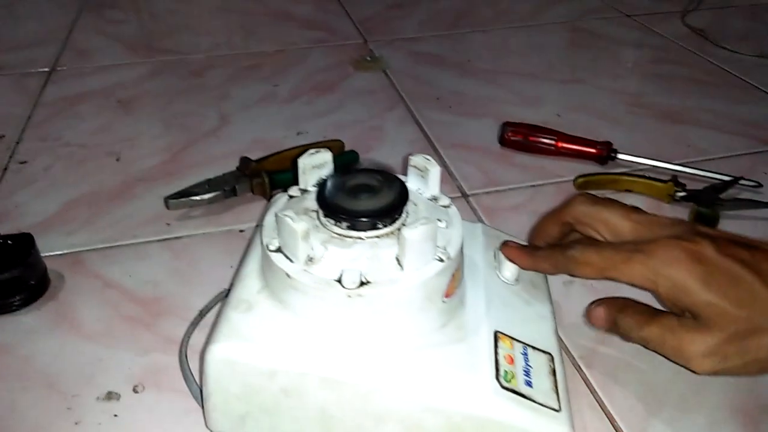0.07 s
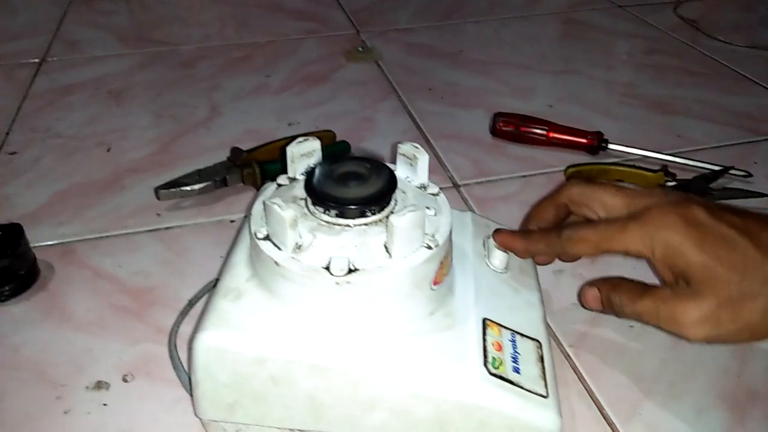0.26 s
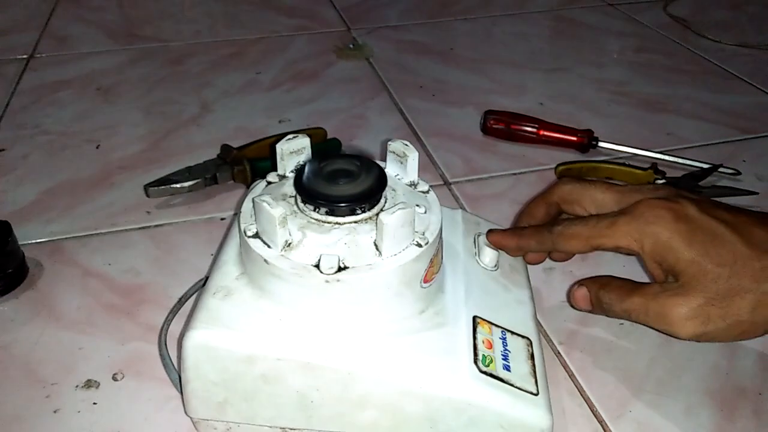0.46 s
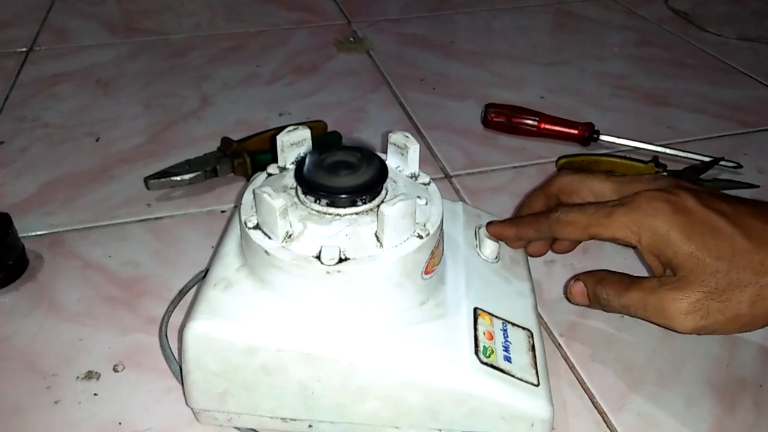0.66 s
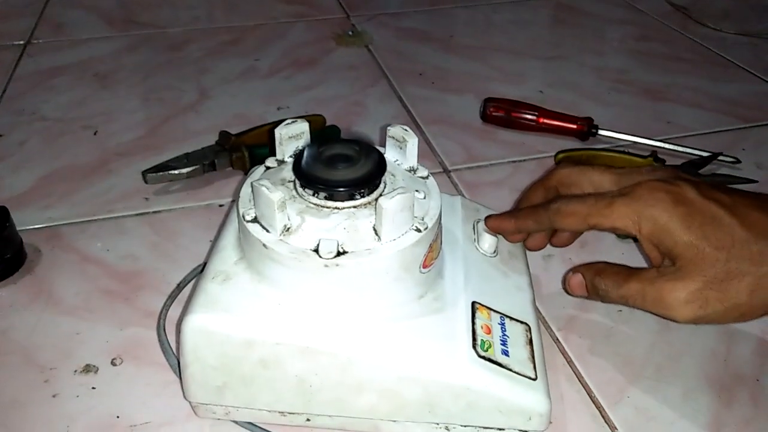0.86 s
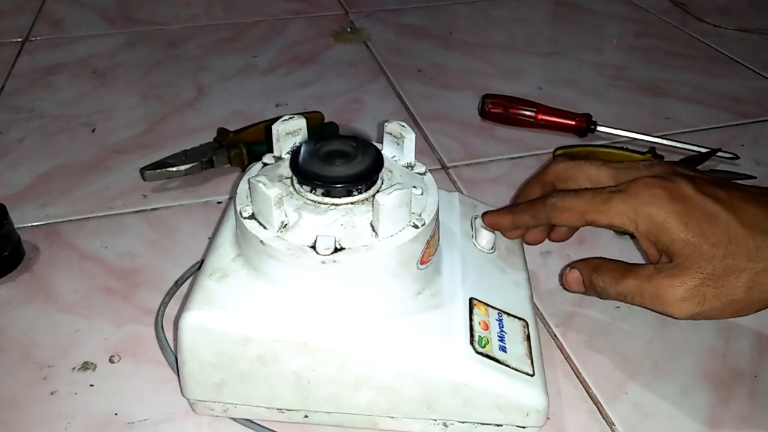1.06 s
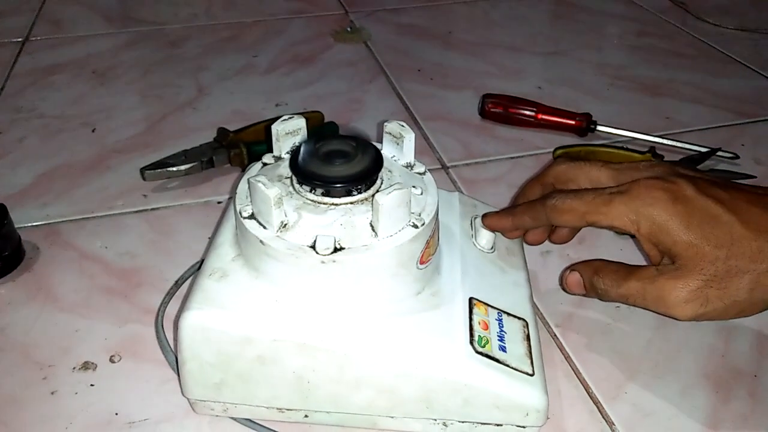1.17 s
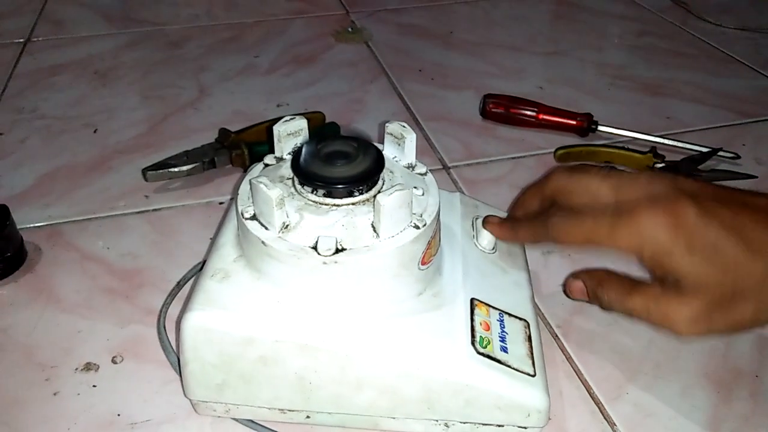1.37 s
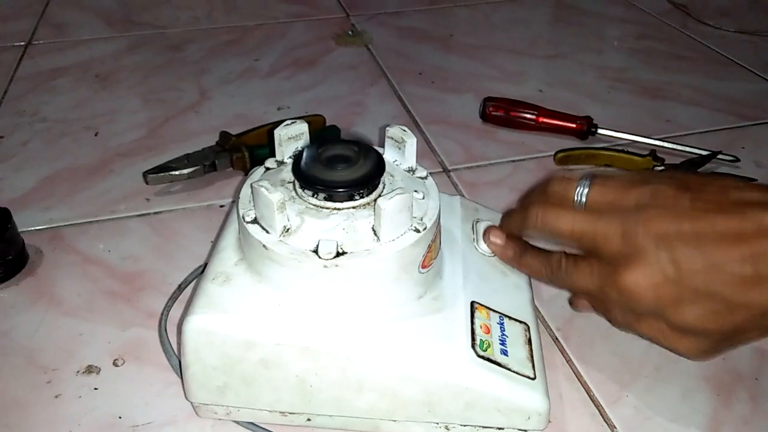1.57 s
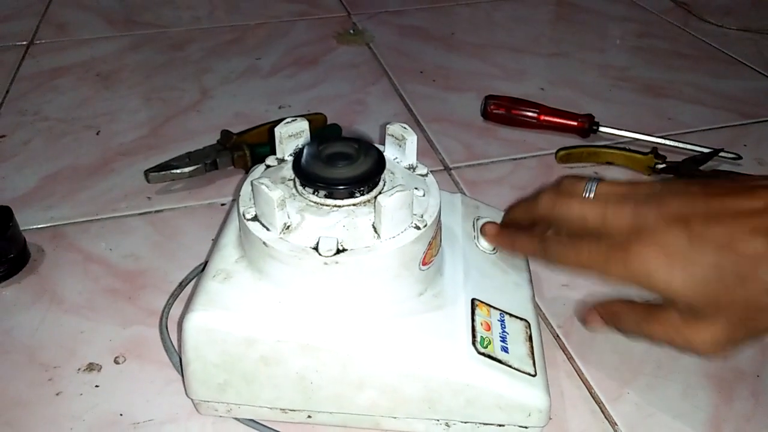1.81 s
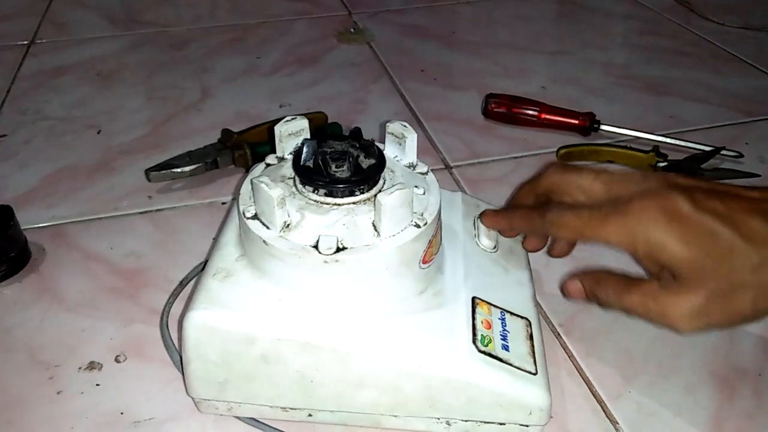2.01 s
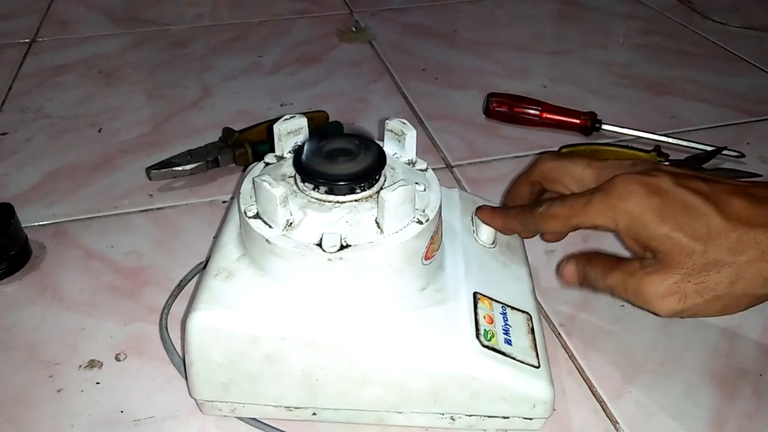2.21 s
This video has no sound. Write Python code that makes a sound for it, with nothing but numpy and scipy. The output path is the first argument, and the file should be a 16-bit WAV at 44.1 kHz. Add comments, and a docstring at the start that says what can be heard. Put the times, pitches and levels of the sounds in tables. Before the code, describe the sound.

Close up in a small hard-floored room, a blender base clicks on, knocks and squeals into full speed, runs steadily with brushy hiss, clicks off and coasts to a stop with faint final knocks.

```python
"""Blender base on a tiled floor

Heard from close by, motor in the middle, short reflections from tiles and walls; the base has no jug.
The switch snaps on, the motor rattles up to about 200 turns a second, hums and whines, then is switched
off and coasts to rest with a few last knocks. The shaft angle drives hum, whine, brush ticks and rattle;
the mains current makes them throb. Switch and knocks are short noise bursts, most through the housing."""
import sys
import numpy as np
from scipy import signal
from scipy.fft import rfft, irfft
from scipy.io import wavfile
from scipy.ndimage import uniform_filter1d

SR = 44100
rng = np.random.default_rng(int(sys.argv[2]) if len(sys.argv) > 2 else 0)


def wav_out(sig):
    """Save sig, one row per channel (or a flat mono array), as 16-bit PCM at SR to the path in sys.argv[1]."""
    wavfile.write(sys.argv[1], SR, np.round(np.clip(np.atleast_2d(sig).T, -1, 1) * 32767).astype(np.int16))


N = 99225
TIME = np.arange(N) / SR
ON_S, OFF_S = 0.222, 1.82  # power on and off


def undb(db):
    """Decibels to gain."""
    return 10 ** (np.asarray(db) / 20)


def unit(x):
    """Scale to rms 1."""
    return x / np.sqrt(np.mean(x ** 2) + 1e-20)


def curve(table):
    """Straight lines between the (t/s, value) points of a table."""
    return np.interp(TIME, *np.array(table).T)


def fader(table, axis=1):
    """Gain from one dB column of a table; silent outside its times."""
    rows = np.array(table)
    return undb(np.interp(TIME, rows[:, 0], rows[:, axis], left=-150, right=-150))


def walk(rate):
    """Smooth random drift with a spread near 1, taking `rate` steps a second."""
    k = int(SR / rate)
    steps = rng.standard_normal(4096)
    path = np.interp(np.arange(N) / k, np.arange(len(steps)), steps)
    return unit(uniform_filter1d(path, k))


def line(cycles):
    """A sine of rms 1 that follows a count of cycles, from a random phase."""
    return np.sqrt(2) * np.sin(2 * np.pi * (cycles + rng.random()))


def puff(turns, width):
    """A smooth swell once a turn."""
    return unit(np.exp((np.cos(2 * np.pi * turns) - 1) / width))


def highpass(x, hz, order):
    """Butterworth high-pass."""
    return signal.sosfilt(signal.butter(order, hz, "high", fs=SR, output="sos"), x)


def lowpass(x, hz, order):
    """Butterworth low-pass."""
    return signal.sosfilt(signal.butter(order, hz, fs=SR, output="sos"), x)


def colour(x, points):
    """Causal (minimum-phase) filter with the given (f/Hz, level/dB) shape."""
    size = 4096
    hz, db = np.array(points).T
    bins_hz = np.arange(size // 2 + 1) * SR / size
    log_gain = np.log(undb(np.interp(np.log(bins_hz + 1), np.log(hz), db)))
    # folding the cepstrum onto positive times makes the filter causal
    cepstrum = irfft(log_gain)[:size // 2]
    cepstrum[1:] *= 2
    return signal.fftconvolve(x, irfft(np.exp(rfft(cepstrum, size))))[:N]


def strikes(turns, angles, sizes, scatter_db, jitter_turns):
    """Band-limited clicks at fixed shaft angles, a little different on every turn."""
    whole = np.arange(np.floor(turns[0]), turns[-1])[:, None]
    chance = rng.standard_normal((2, len(whole), len(angles)))
    struck = whole + angles + jitter_turns * chance[0]
    at = np.interp(struck, turns, np.arange(N), left=-1, right=-1).ravel()
    size = (sizes * undb(scatter_db * chance[1])).ravel()[at > 0, None]
    at = at[at > 0, None]
    # a windowed sinc places each click between samples
    taps = at.astype(int) + np.arange(-7, 9)
    shape = np.sinc(taps - at) * np.sinc((taps - at) / 8)
    return np.bincount(np.clip(taps, 0, N - 1).ravel(), (size * shape).ravel(), N)


# shaft speed: t/s, speed/turns per second
SPEED = [(0.222, 0.0), (0.268, 78.0), (0.295, 113.0), (0.35, 151.0), (0.45, 177.0), (0.53, 187.8),
         (0.68, 196.5), (0.85, 202.7), (1.11, 204.3), (1.32, 203.2), (1.41, 202.0), (1.5, 202.7),
         (1.57, 199.8), (1.75, 200.1), (1.82, 198.7), (1.9, 145.0), (2.159, 0.0)]
LAST_KNOCK_S = 2.11  # the shaft angle is counted from here


def shaft():
    """Speed of the motor shaft, and its angle in turns as the running sum of that speed."""
    speed = curve(SPEED)
    turns = np.cumsum(speed + 1e-6) / SR
    return speed, turns - np.interp(LAST_KNOCK_S, TIME, turns)


# hum of the unbalanced rotor: t/s, level/dB
HUM = [(.44, -42), (.53, -24), (.65, -18), (.8, -19.3), (.95, -16.3), (1.12, -16.5), (1.22, -14.7),
       (1.5, -16.7), (1.58, -19), (1.68, -19.5), (1.81, -24), (1.845, -50)]
HUM_ORDER = 3  # cycles per turn
# other shaft harmonics: cycles per turn; base level/dB of each
OVERTONE_ORDERS = [2, 4, 5, 6, 7, 10, 11, 12, 14, 18, 22]
OVERTONE_DB = [-38.5, -25, -31.5, -37.5, -27, -40.5, -44, -37, -45, -53.5, -50]
# strength of overtones and beats, also of two whine partials: t/s, level/dB
OVERTONE_LEVEL = [(.38, -21), (.47, 2), (.6, -4.5), (.85, -2), (1.3, -2), (1.55, -3), (1.81, -8),
                  (1.86, -48)]
# middle overtones, strongest in mid-run: cycles per turn; then t/s, extra level/dB
MIDDLE_ORDERS = [5, 6, 7]
MIDDLE_LEVEL = [(.38, -8), (.7, -2), (.9, 2), (1.3, 1), (1.42, -2), (1.55, -3), (1.66, -7), (1.86, -7)]
# harmonics that gain a line one mains pulse rate higher: cycles per turn; base level/dB of that line
BEAT_ORDERS = [3, 5, 10, 12]
BEAT_DB = [-31, -38, -40.5, -47.5]
# a higher overtone that is strongest late in the run: t/s, level/dB
LATE_TONE = [(.6, -47), (.85, -36), (1.35, -37), (1.5, -32), (1.65, -34), (1.81, -34), (1.86, -46.5)]
LATE_ORDER = 9  # cycles per turn
OVERTONE_WANDER_DB = 2.5
HUM_THROB, OVERTONE_THROB = 0.064, 0.18  # throb depths before growth
HUM_LAG = -0.25  # share of a mains pulse


def tones(turns):
    """Rotor hum at shaft harmonics, with wandering overtones and their beats with the mains."""
    hum = line(HUM_ORDER * turns) * fader(HUM) * throb(HUM_THROB, HUM_LAG)
    overtones = np.zeros(N)
    for order, db in zip(OVERTONE_ORDERS, OVERTONE_DB):
        tone = line(order * turns) * undb(db + OVERTONE_WANDER_DB * walk(7))
        overtones += tone * (fader(MIDDLE_LEVEL) if order in MIDDLE_ORDERS else 1)
    beats = np.zeros(N)
    for order, db in zip(BEAT_ORDERS, BEAT_DB):
        pulsed = line(order * turns + MAINS_PULSE_HZ * TIME)
        beats += pulsed * undb(db + OVERTONE_WANDER_DB * walk(7))
    late = line(LATE_ORDER * turns) * fader(LATE_TONE)
    upper = (overtones * throb(OVERTONE_THROB, HUM_LAG) + beats) * fader(OVERTONE_LEVEL)
    return hum + late + highpass(upper, HOUSING_CUT_HZ, order=12)


# growth of the throb, deepest late in the run: t/s, factor on its depth
THROB_GROWTH = [(.3, .4), (.7, .9), (1.3, .8), (1.5, 1.3), (1.62, 2), (1.82, 1.8)]
MAINS_PULSE_HZ = 100.15


def throb(depth, lag=0):
    """The motor's force swells twice in each mains cycle while the switch is on."""
    depth = depth * curve(THROB_GROWTH) * (TIME > ON_S) * (TIME < OFF_S)
    swell = np.cos(2 * np.pi * (MAINS_PULSE_HZ * TIME - lag))
    return np.exp(depth * swell - depth ** 2 / 2)


# commutator whine: t/s, level/dB
WHINE = [(.4, -36), (.48, -32), (.56, -23.5), (.7, -28), (.86, -25), (1.08, -27.5), (1.24, -23), (1.5, -23),
         (1.57, -24.5), (1.815, -34.5), (1.83, -68)]
# higher squeal of the run-up: t/s, level/dB
SQUEAL = [(.35, -50), (.395, -24), (.44, -41.5), (.5, -31), (.56, -55.5), (.7, -58)]
# cycles per turn; the whine has two per commutator bar
WHINE_ORDER, SQUEAL_ORDER, HOLDER_ORDER, UNDER_ORDER = 48, 63, 30, 36
RASP_CYCLES = 0.15  # timing spread of the raspy partials
HOLDER_HZ, HOLDER_WIDTH_HZ, HOLDER_DB = 6000, 340, -35.5
UNDER_DB = -34.5  # rough partial under the whine
WHINE_THROB = 0.25  # depth before growth
BRUSH_LAG = 0.18  # share of a mains pulse


def whine(turns):
    """The commutator whines, squeals higher in the run-up and rings the brush holder, throbbing with the mains."""
    flutter = undb(1.5 * walk(54.17) + 1.9 * walk(11))
    main = line(WHINE_ORDER * turns) * fader(WHINE) * flutter * puff(turns - 0.3, width=4.5)
    squeal = line(SQUEAL_ORDER * turns + RASP_CYCLES * walk(CHATTER_RATE)) * fader(SQUEAL)
    rasp = line(HOLDER_ORDER * turns + RASP_CYCLES * walk(CHATTER_RATE)) * fader(OVERTONE_LEVEL)
    resonance = signal.iirpeak(HOLDER_HZ, HOLDER_HZ / HOLDER_WIDTH_HZ, fs=SR)
    holder = undb(HOLDER_DB) * signal.lfilter(*resonance, rasp)
    under = line(UNDER_ORDER * turns + RASP_CYCLES / 2 * walk(CHATTER_RATE))
    under = under * fader(OVERTONE_LEVEL) * undb(UNDER_DB)
    return (main + under + squeal + holder) * throb(WHINE_THROB, BRUSH_LAG)


# brush chatter, until they seat and again in short fits: t/s, timing spread/whine cycles
CHATTER = [(.25, 0), (.33, .22), (.5, .17), (.72, .14), (.85, .06), (1.02, .06), (1.09, .17), (1.17, .06),
           (1.31, .05), (1.36, .12), (1.42, .05), (1.53, .1), (1.6, .05), (1.82, .05), (1.9, 0)]
CHATTER_RATE = 600  # changes per second


def chatter(turns):
    """Chattering brushes meet the bars early or late, so the angle they follow is jittered."""
    return turns + curve(CHATTER) * walk(CHATTER_RATE) / WHINE_ORDER


# loudness of bearing rattle and brush scrape: t/s, rattle level/dB, scrape level/dB
FRICTION = [(.222, -50, -44), (.25, -24, -39), (.31, -24, -27), (.47, -27.5, -26), (.62, -32.5, -24.5),
            (.85, -30, -26), (1.45, -29.5, -27.5), (1.65, -39.5, -32), (1.81, -50, -40), (1.84, -51, -32.5),
            (1.91, -34.5, -37.5), (1.99, -31.5, -42), (2.05, -37, -58.5), (2.085, -45, -54),
            (2.135, -83, -73)]
# chafing of the slow shaft, once a turn: t/s, level/dB
CHAFE = [(.255, -44), (.292, -28.5), (.32, -37), (.4, -42), (.5, -59), (.62, -62), (1.895, -88),
         (1.918, -30.5), (1.985, -28.5), (2.03, -37), (2.085, -47.5), (2.12, -56.5)]
# colours of scrape and chafe: f/Hz, relative level/dB
SCRAPE_COLOUR = [(400, -20), (1200, 3.5), (2300, -2.5), (3200, -14.5), (4400, -11.5), (5400, -10),
                 (6100, -2), (6700, -6.5), (7300, -11.5), (8100, -6.5), (9800, 1.5), (10800, -2.5),
                 (11700, -5.5), (13000, -12), (14400, -20.5)]
CHAFE_COLOUR = [(2000, -34.5), (3600, -23.5), (4700, -54), (6200, -13), (7200, -9), (10000, 11.5),
                (10900, 5.5), (11800, 3.5), (14500, -24)]
BRUSH_THROB = 0.22  # depth before growth
BRUSH_SPREAD, BRUSH_HISS_DB = 2.2, -10  # width of the swell in each turn; hiss against the ticks
CHAFE_SPREAD_SLOW, CHAFE_SPREAD_FAST = 0.52, 3.9  # swell width at rest, and added at full speed


def brushes(turns, speed):
    """Carbon brushes hiss and tick over uneven bars, much alike each turn; the slow shaft chafes."""
    # one tick per whine cycle
    angles = (np.arange(WHINE_ORDER) + rng.random(WHINE_ORDER)) / WHINE_ORDER
    sizes = rng.standard_normal(WHINE_ORDER) * undb(2.1 * rng.standard_normal(WHINE_ORDER))
    ticks = strikes(turns, angles, sizes, scatter_db=4.5, jitter_turns=0.00018)
    # dividing by the root of speed offsets the greater number of ticks
    scrape = unit(ticks / np.sqrt(speed + 10)) + undb(BRUSH_HISS_DB) * rng.standard_normal(N)
    scrape = scrape * throb(BRUSH_THROB, BRUSH_LAG) * puff(turns, BRUSH_SPREAD)
    scrape = unit(colour(scrape, SCRAPE_COLOUR))
    spread = CHAFE_SPREAD_SLOW + CHAFE_SPREAD_FAST * (speed / speed.max()) ** 2
    chafe = unit(colour(rng.standard_normal(N), CHAFE_COLOUR)) * puff(turns - 0.04, spread)
    return scrape * fader(FRICTION, axis=2) + chafe * fader(CHAFE)


# groan of the shaft while it changes speed: t/s, level/dB
GROAN = [(.27, -37), (.32, -35), (.45, -33), (.54, -39), (.66, -59), (.8, -66.5), (1.815, -68.5),
         (1.835, -39.5), (1.89, -36.5), (1.915, -47.5), (1.99, -47), (2.03, -55)]
# its harmonics: cycles per turn; relative level/dB of each
GROAN_ORDERS = [3, 4, 5, 6, 7, 9, 12]
GROAN_DB = [2, -1, -1, -2, 2, -7, 4]
# rough spots round the bearing; their spread from turn to turn in size and angle; share of grinding noise
BUMP_COUNT, BUMP_SCATTER_DB, BUMP_JITTER_TURNS, GRIND_DB = 18, 3.2, 0.005, -9
BUMP_SPREAD_SLOW, BUMP_SPREAD_FAST = 0.3, 1.1  # swell width at rest, and added at full speed
RATTLE_THROB = 0.17  # depth before growth
COASTING_TOP_HZ = 1650  # without power it sounds duller


def rattle(turns, speed):
    """The loose shaft runs over bumps, hardest on one side, and groans as its harmonics cross housing modes."""
    angles = (np.arange(BUMP_COUNT) + rng.random(BUMP_COUNT)) / BUMP_COUNT
    signs = rng.choice([-1, 1], BUMP_COUNT)
    bumps = strikes(turns, angles, signs, BUMP_SCATTER_DB, BUMP_JITTER_TURNS)
    force = unit(bumps / np.sqrt(speed + 10)) + undb(GRIND_DB) * rng.standard_normal(N)
    spread = BUMP_SPREAD_SLOW + BUMP_SPREAD_FAST * (speed / speed.max()) ** 2
    contact = puff(turns - 0.05, spread)
    clatter = unit(housing(force * contact * throb(RATTLE_THROB))) * fader(FRICTION, axis=1)
    groan = np.zeros(N)
    for order, db in zip(GROAN_ORDERS, GROAN_DB):
        groan += line(order * turns) * undb(db + 3.2 * walk(40.06))
    loaded = clatter + housing(groan * fader(GROAN))
    coasting = lowpass(loaded, COASTING_TOP_HZ, order=3)
    return np.where(TIME < OFF_S, loaded, coasting)


# knocks of the shaft: t/s, peak level/dB
KNOCKS = [(0.241, -15), (0.283, -17), (0.304, -23), (0.426, -28), (0.434, -21), (2.045, -28.5),
          (2.062, -28), (2.078, -31.5), (2.108, -37), (2.114, -41)]
KNOCK_S = 0.001  # each push peaks this long after it starts


def knocks():
    """The shaft knocks in its bearing as it jerks into motion and in its last turns."""
    out = np.zeros(N)
    for start, db in KNOCKS:
        age = np.maximum(TIME - start, 0) / KNOCK_S
        blow = housing(rng.standard_normal(N) * age * np.exp(-age))
        out += undb(db) * blow / np.abs(blow).max()
    return out


# the finger loads the switch just before the first snap: t/s, level/dB
PRESS = [(.185, -88), (.2, -65), (.214, -56), (.219, -38), (.225, -43)]
# switch snaps: t/s, level/dB, decay/s, peak level of the housing thud/dB, low edge of the snap f/Hz
SWITCH = [(0.2239, -12, 0.0043, -18, 352), (1.8184, -7.5, 0.0037, -18.5, 2820)]
# colour of the snap: f/Hz, relative level/dB
SWITCH_COLOUR = [(40, -71.5), (150, -15.5), (330, -6.5), (500, 14.5), (900, -4.5), (1300, 16.5),
                 (2100, 2.5), (3200, -22), (4700, -11), (5900, 2.5), (7000, -9.5), (8300, -1.5),
                 (10500, -11), (12500, -4), (14500, -22.5)]


def switch():
    """A soft press before switching on; each flick is a decaying noise snap and a thud of the housing."""
    out = unit(housing(rng.standard_normal(N))) * fader(PRESS)
    for start, db, decay, thud_db, low_hz in SWITCH:
        fade = np.exp(-np.maximum(TIME - start, 0) / decay) * (TIME >= start)
        snap = unit(colour(rng.standard_normal(N) * fade, SWITCH_COLOUR))
        snap = snap * np.sqrt(np.mean(fade ** 2))
        thud = housing(rng.standard_normal(N) * fade)
        out += undb(db) * highpass(snap, low_hz, order=2)
        out += undb(thud_db) * thud / np.abs(thud).max()
    return out


# ringing modes of the plastic housing: f/Hz, width/Hz, relative level/dB
HOUSING = [(469.8, 27, 10), (593, 26, 6), (700, 70, 5), (889.6, 44, 6), (1165, 89, 7), (1514, 91, -1.5),
           (2157, 78, -1), (2700, 70, -13)]
HOUSING_CUT_HZ, HOUSING_TOP_HZ = 392, 2620


def housing(x):
    """The plastic shell rings in its modes and radiates little bass or treble."""
    rings = np.zeros(N)
    for k, (hz, width, db) in enumerate(HOUSING):
        mode = signal.lfilter(*signal.iirpeak(hz, hz / width, fs=SR), x)
        rings += (-1) ** k * undb(db) * mode  # neighbours in opposite phase
    return highpass(lowpass(rings, HOUSING_TOP_HZ, order=2), HOUSING_CUT_HZ, order=8)


def room(x, t60):
    """Diffuse reflections from tiles and walls: a decaying noise tail of unit energy."""
    tail = rng.standard_normal(N) * np.exp(-np.log(1000) * TIME / t60)
    return signal.fftconvolve(x, tail / np.linalg.norm(tail))[:N]


# colours of room tone and running rumble: f/Hz, relative level/dB
ROOM_COLOUR = [(25, -8), (85, -13), (130, 2.5), (170, 8.5), (260, -10), (550, -6), (950, 2), (1600, -11),
               (3000, -21.5), (6000, -23.5), (10000, -30), (14500, -33.5)]
RUMBLE_COLOUR = [(25, -12.5), (60, -14), (86, -7.5), (125, -21), (170, 11.5), (250, 3), (320, 15),
                 (450, -30), (900, -34)]
LOW_HUM_HZ, LOW_HUM_DB, LOW_HUM_IDLE_DB = 85.6, -65, -75.5  # LOW_HUM_DB is added at full speed
RUMBLE_DB, ROOM_TONE_DB = -57, -68.5  # rumble at full speed; room tone before its drift


def background(speed):
    """Quiet room tone and a low hum; the hum grows and a noise rumble joins while the motor turns."""
    running = (speed / speed.max()) ** 2
    hum = np.sqrt(2) * np.sin(2 * np.pi * LOW_HUM_HZ * TIME) * undb(4 * walk(3.7))
    rumble = undb(RUMBLE_DB) * unit(colour(rng.standard_normal(N), RUMBLE_COLOUR))
    air = undb(ROOM_TONE_DB + 1.5 * walk(7.7)) * unit(colour(rng.standard_normal(N), ROOM_COLOUR))
    return air + undb(LOW_HUM_IDLE_DB) * hum + running * (rumble + undb(LOW_HUM_DB) * hum)


# stereo width of the treble, wide in run-up and run-down, nearly mono between: t/s, side level/dB
WIDTH = [(.2, -56), (.27, -7), (.35, -4.5), (.5, -10), (.65, -14), (.75, -47), (.9, -63), (1.8, -60.5),
         (1.92, -12.5), (2.2, 0)]
WIDE_ABOVE_HZ = 9050
ROOM_T60_S, ROOM_DB = 0.27, -20.5  # room send, before its colour
TICK_CHATTER = 0.35  # share of the chatter that reaches the brush ticks
SHAFT_WOBBLE_TURNS = 0.0005


def scene():
    """The motor close by in the middle of the stereo image; only the treble has any width."""
    speed, turns = shaft()
    brush_turns = chatter(turns)
    tick_turns = turns + TICK_CHATTER * (brush_turns - turns)
    noises = rattle(turns, speed) + knocks() + brushes(tick_turns, speed) + switch()
    dry = noises + tones(turns + SHAFT_WOBBLE_TURNS * walk(93)) + whine(brush_turns)
    reflections = colour(room(noises, ROOM_T60_S), [(1500, 15), (5000, 1)])
    mid = dry + undb(ROOM_DB) * reflections + background(speed)
    side = highpass(room(dry, t60=0.012), WIDE_ABOVE_HZ, order=6) * fader(WIDTH)
    return np.array([mid + side, mid - side])


TOP_HZ = 14500


def record(dry):
    """The recorder behind the microphones cuts the top steeply."""
    return signal.sosfilt(signal.ellip(10, 0.2, 80, TOP_HZ, fs=SR, output="sos"), dry)


dry = scene()
out = record(dry)
wav_out(out)
```